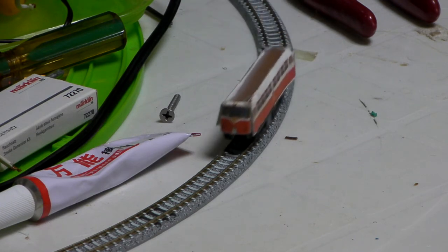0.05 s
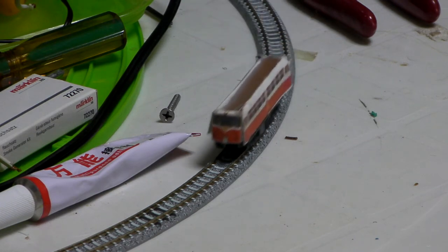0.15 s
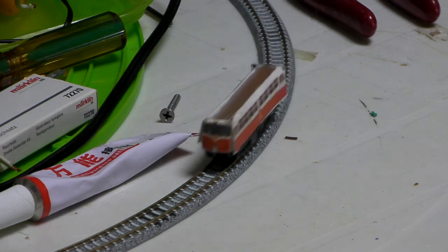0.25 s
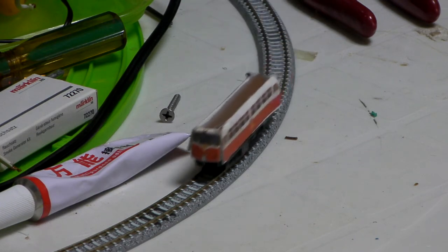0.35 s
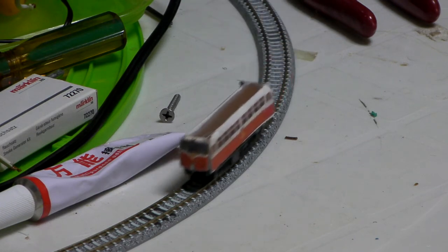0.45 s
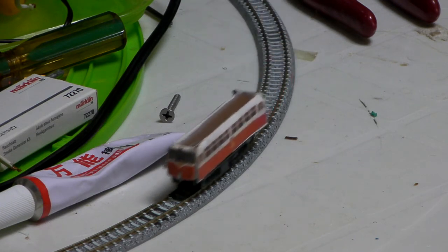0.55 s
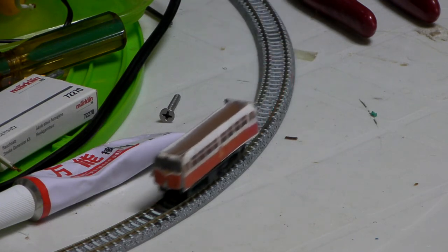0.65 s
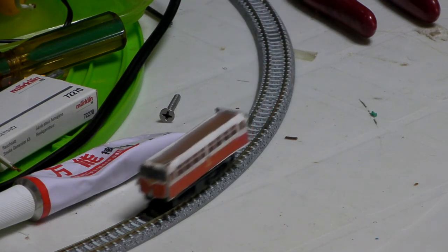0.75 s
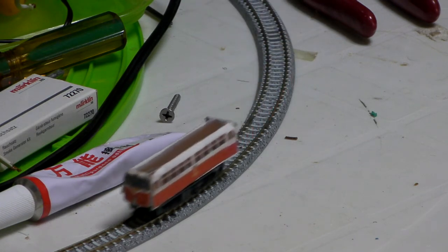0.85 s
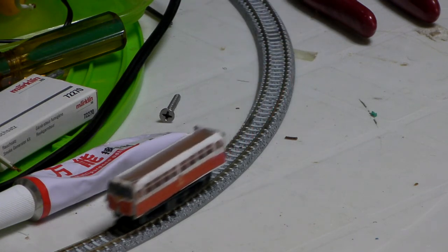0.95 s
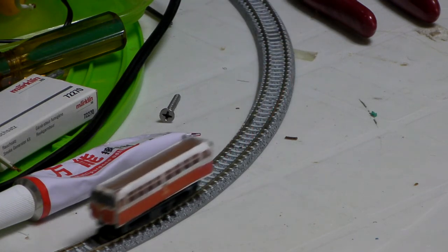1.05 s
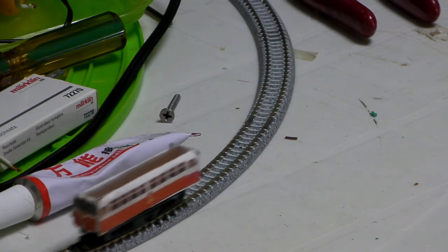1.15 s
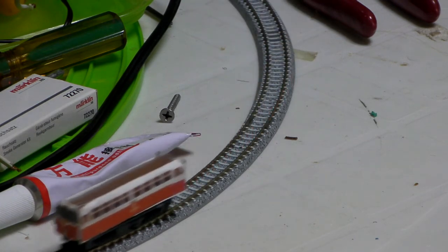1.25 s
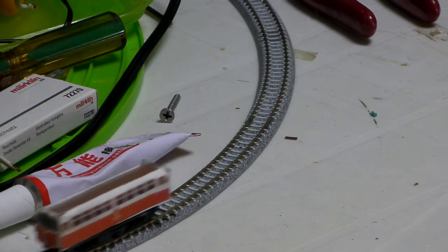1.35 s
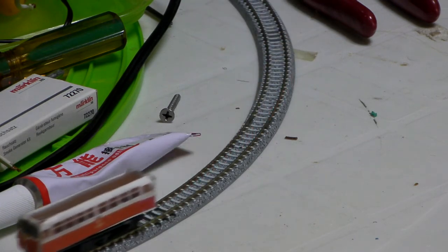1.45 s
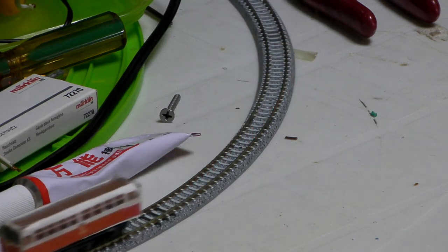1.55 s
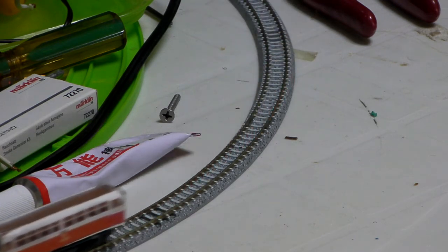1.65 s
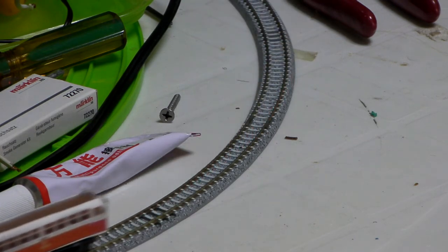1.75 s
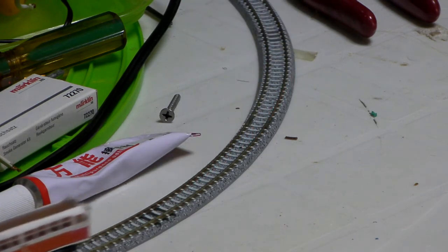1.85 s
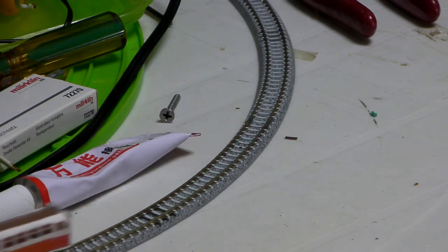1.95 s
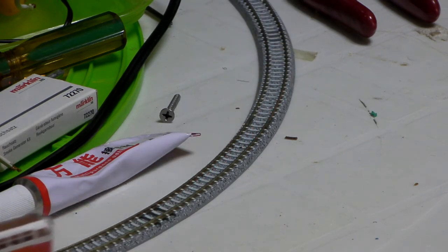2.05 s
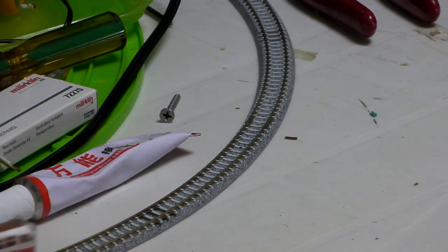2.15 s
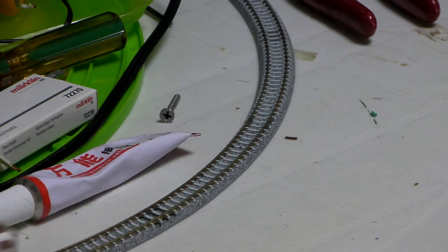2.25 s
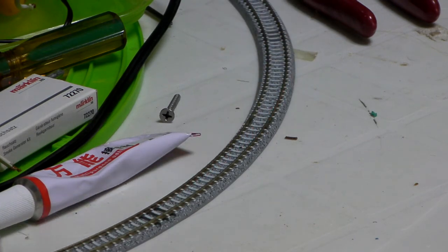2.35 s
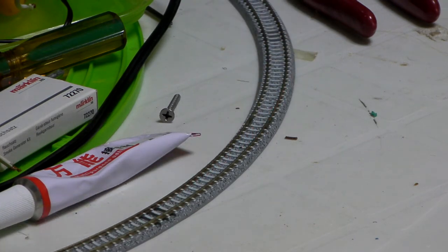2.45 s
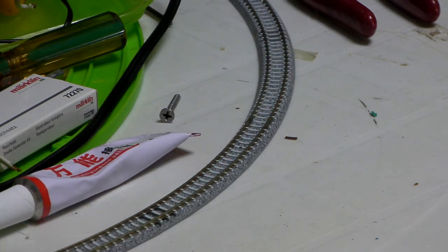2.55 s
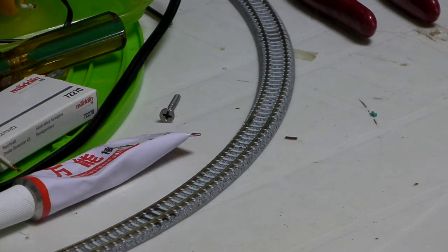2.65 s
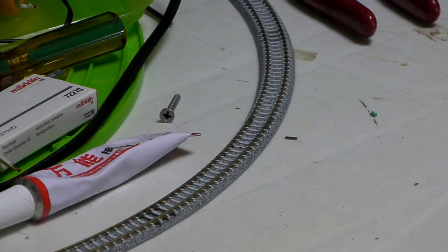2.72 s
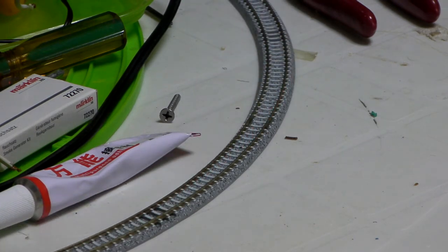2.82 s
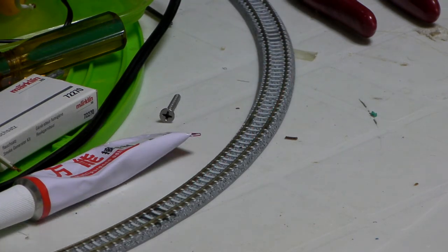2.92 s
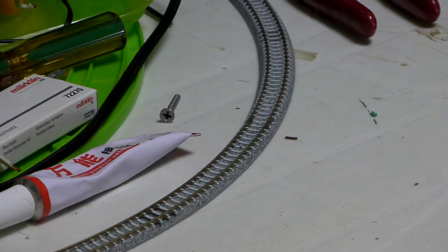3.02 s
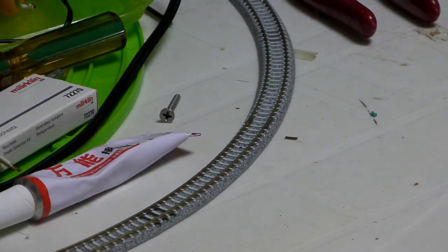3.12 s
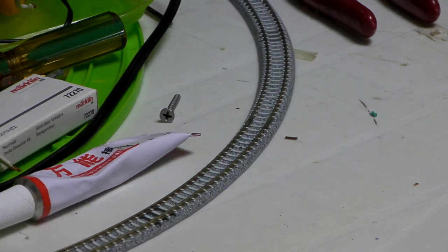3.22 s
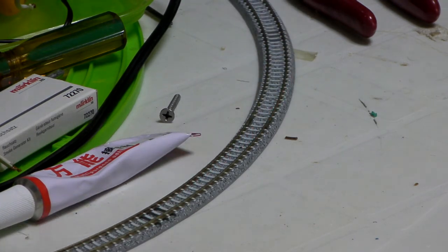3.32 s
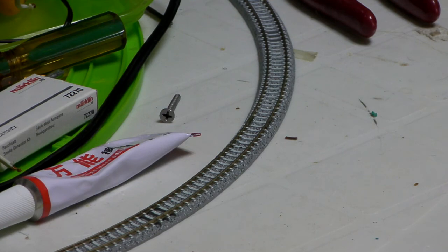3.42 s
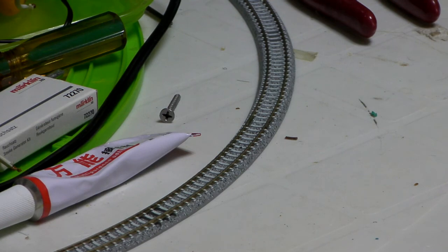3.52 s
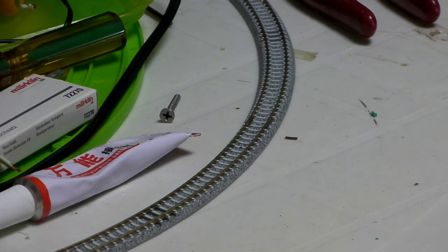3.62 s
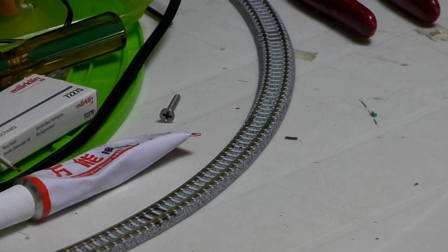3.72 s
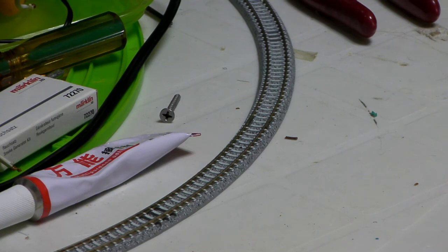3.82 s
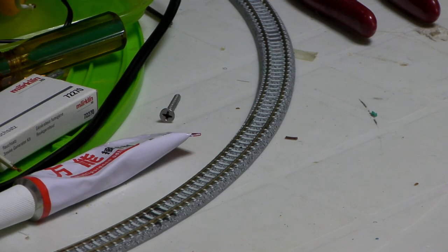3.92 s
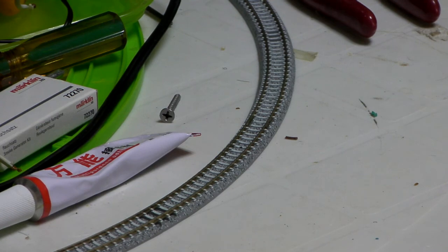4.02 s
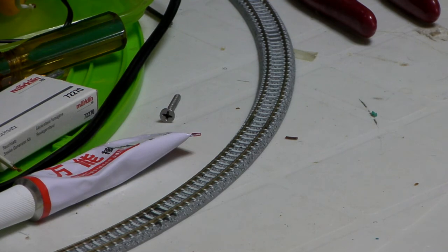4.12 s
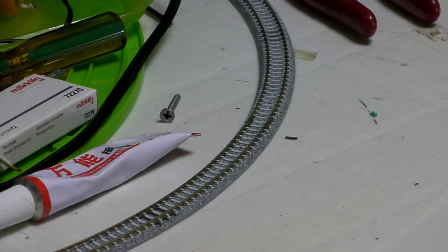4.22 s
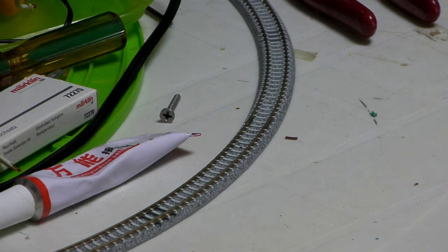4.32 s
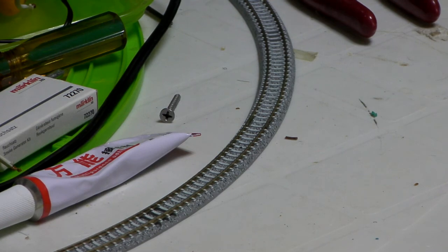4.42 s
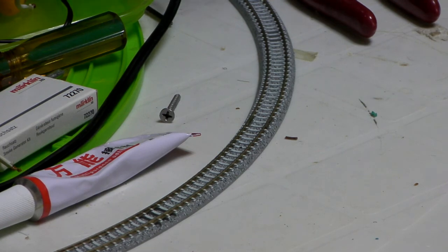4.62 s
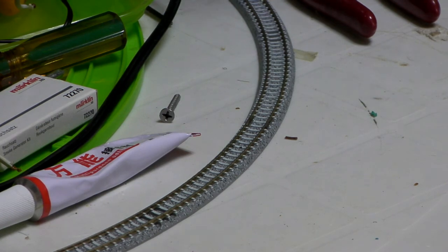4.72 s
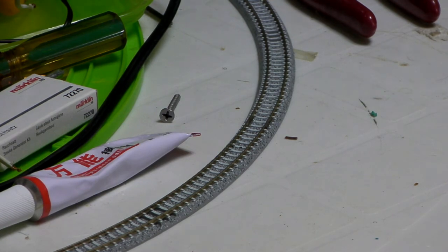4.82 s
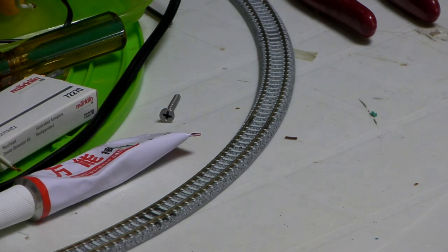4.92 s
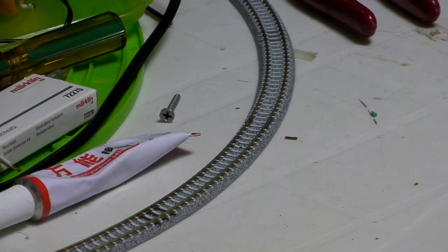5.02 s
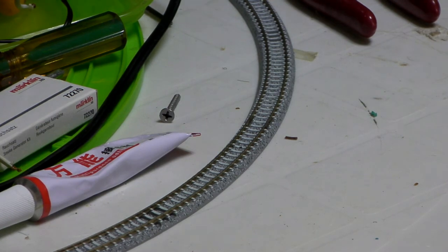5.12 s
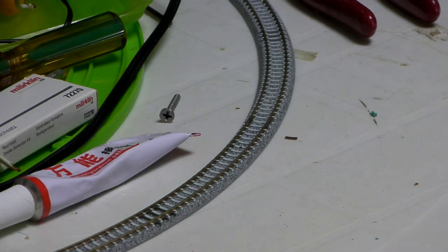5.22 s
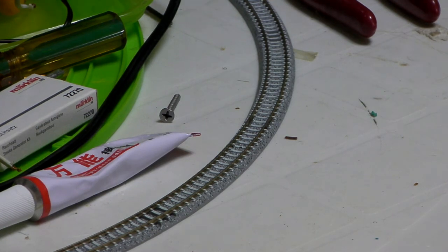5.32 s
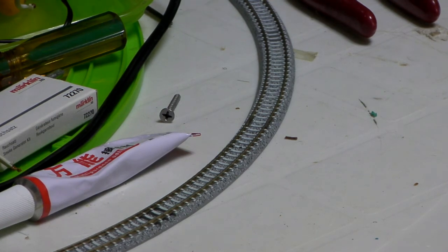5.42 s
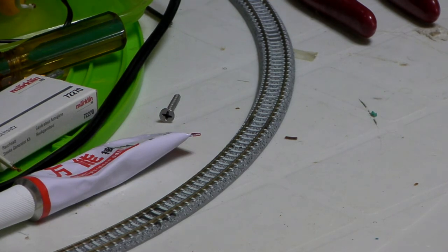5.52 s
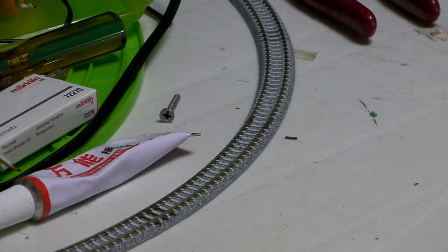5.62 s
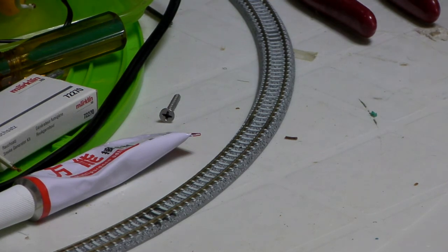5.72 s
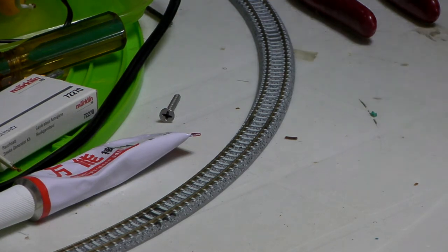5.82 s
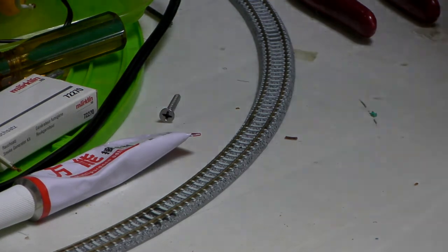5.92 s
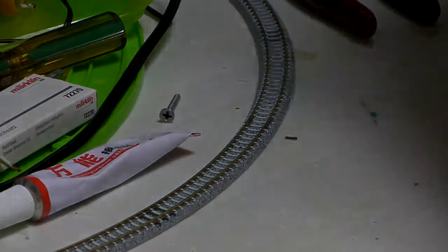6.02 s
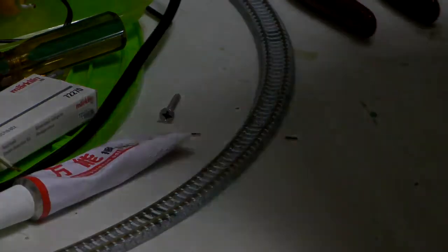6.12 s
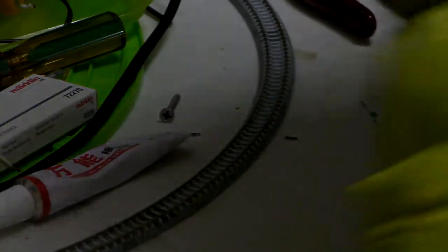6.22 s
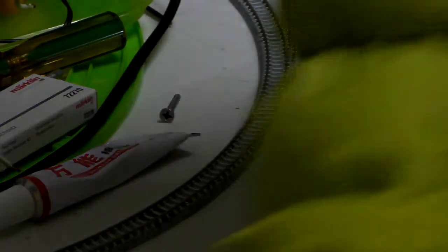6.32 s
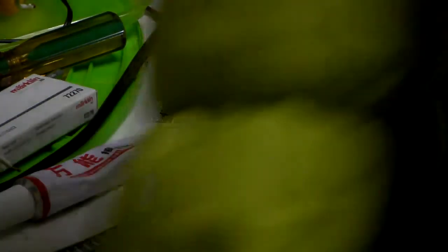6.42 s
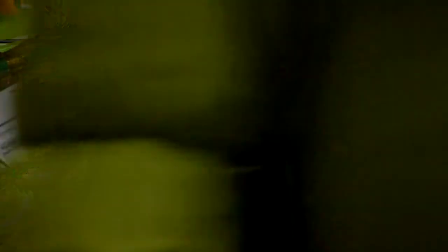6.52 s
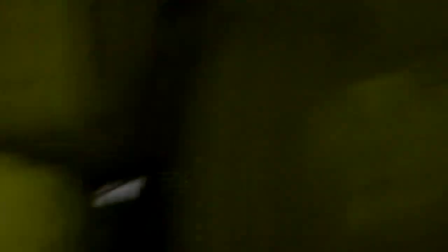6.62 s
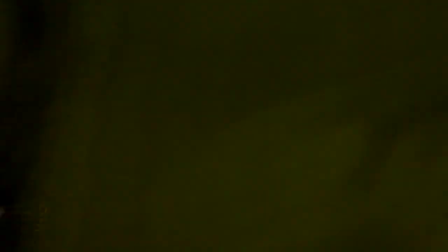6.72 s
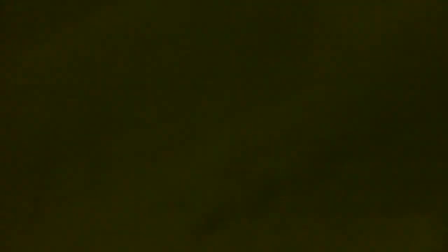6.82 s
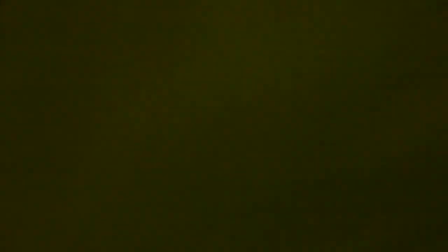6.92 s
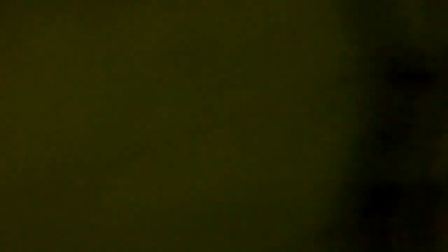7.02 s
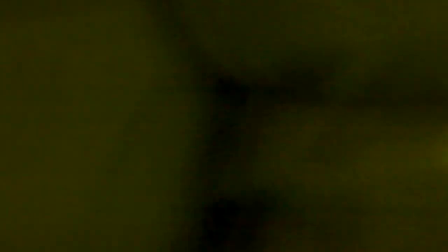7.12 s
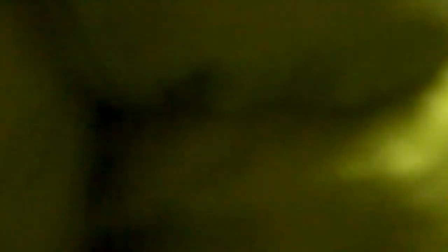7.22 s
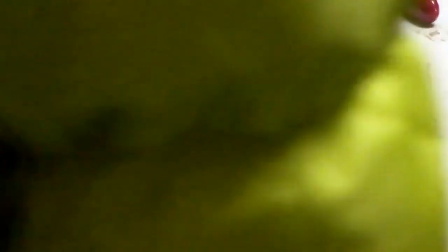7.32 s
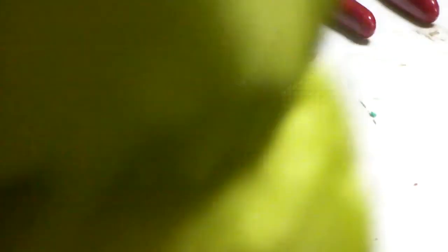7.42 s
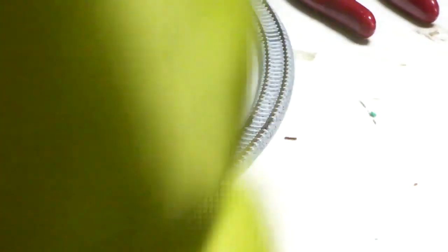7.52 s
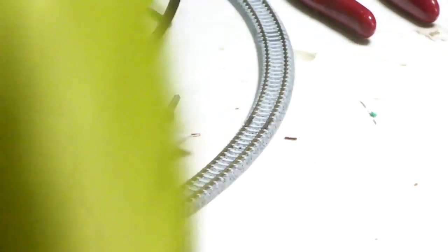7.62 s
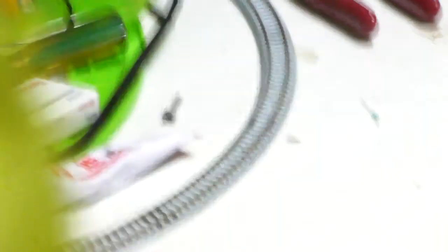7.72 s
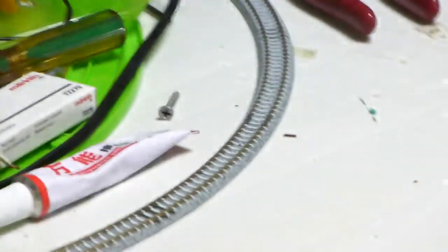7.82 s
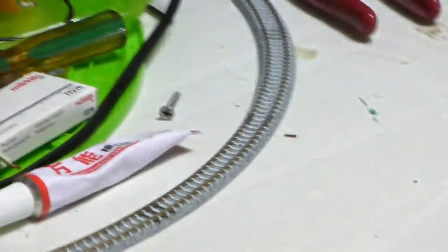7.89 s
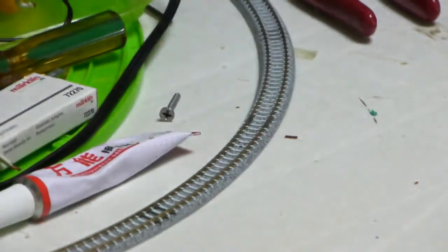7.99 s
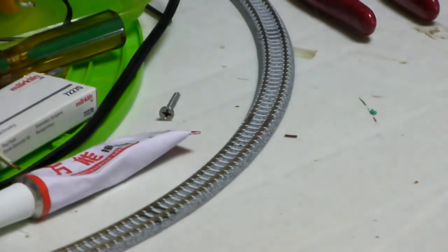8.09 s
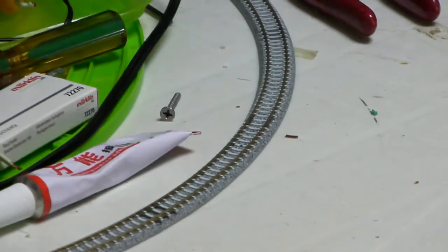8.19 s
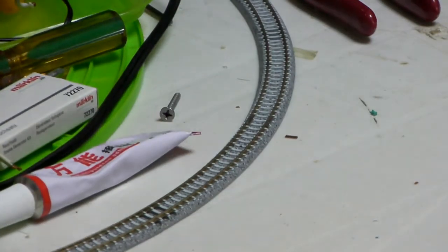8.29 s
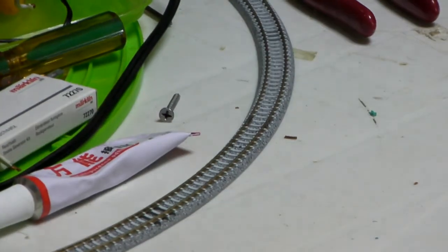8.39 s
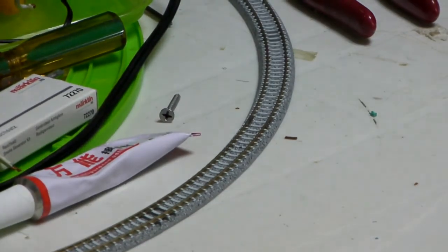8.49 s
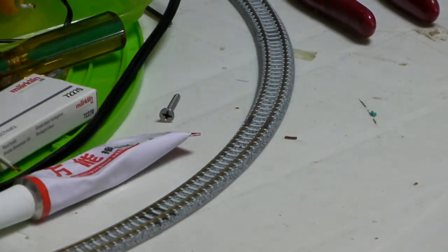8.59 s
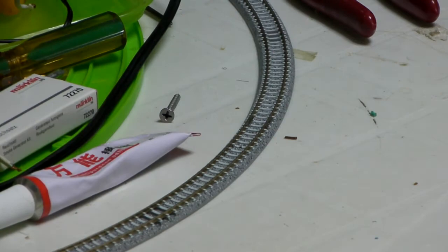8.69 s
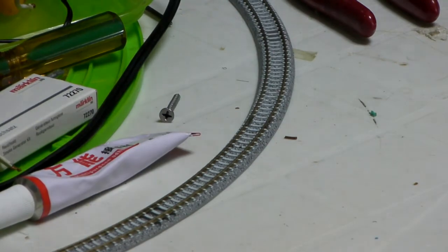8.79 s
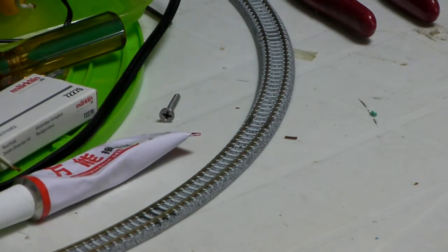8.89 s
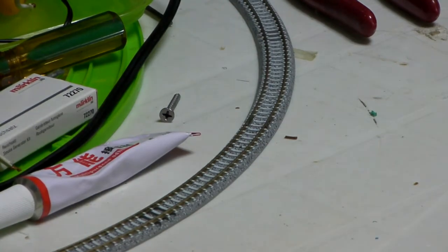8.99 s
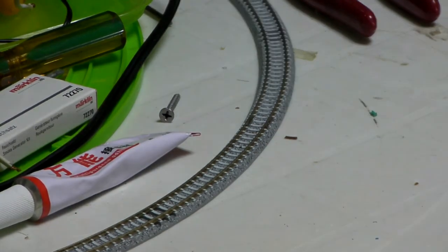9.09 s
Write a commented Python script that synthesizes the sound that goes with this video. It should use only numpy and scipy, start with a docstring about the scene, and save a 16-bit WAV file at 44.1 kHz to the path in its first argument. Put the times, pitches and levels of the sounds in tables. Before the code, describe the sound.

A tiny model railcar whirs with hiss and thin gear whine, a sharp click stops it, then cloth rustles and bumps close by.

```python
"""Toy railcar on a tabletop

A tiny electric railcar whirs on its track: brush hiss and gear whine, ringing in a plastic shell.
Something knocks the table, a switch snaps and the motor stops. Then a sleeve rustles close to the
microphone and bumps it softly. Knocks, bumps and ticks echo in a small room, over its steady hush.
Hiss and cloth are shaped noise, the whine is a throbbing sine, and struck things are dying sines."""
import sys
import numpy as np
from scipy import signal
from scipy.fft import rfft, irfft, next_fast_len
from scipy.io import wavfile
from scipy.ndimage import uniform_filter1d

SR = 44100
rng = np.random.default_rng(int(sys.argv[2]) if len(sys.argv) > 2 else 0)


def unload_audio(sound):
    """Save the sound as a 16-bit wav file, at the path given as the first command line argument."""
    columns = np.transpose(np.atleast_2d(sound))
    # keep every value between -1 and 1, then stretch to whole-number steps
    steps = np.round(np.clip(columns, -1, 1) * 32767)
    wavfile.write(sys.argv[1], SR, steps.astype(np.int16))


N = 403515
T = np.arange(N) / SR  # clock of the whole take, s

# Likeness of the cloth noise at the two microphones: (frequency [Hz], left-right likeness [0-1])
CLOTH_SAME = [(60, 0.92), (180, 0.95), (550, 0.91), (1650, 0.76), (4970, 0.28), (15000, 0.061)]


def amp(db):
    """Turns decibels into gain."""
    return 10 ** (np.asarray(db) / 20)


def evened(x):
    """Scales a sound to rms 1."""
    return x / np.sqrt(np.mean(x ** 2) + 1e-20)


def read(points, hz):
    """Reads a spectrum table on a log-frequency axis."""
    f, value = np.transpose(points)
    return np.interp(np.log(hz + 1), np.log(f + 1), value)


def curves(rows):
    """Draws each column of a time table as a curve at every sample."""
    s, *columns = np.transpose(rows)
    return [np.interp(T, s, c) for c in columns]


def add(mix, s, sound):
    """Mixes a sound in at a time in seconds."""
    part = mix[round(s * SR):][:len(sound)]
    part += sound[:len(part)]


def noise(shape, same, patchy_db):
    """Two-channel noise of a given spectrum and likeness, with drifting patches, rms 1."""
    size = next_fast_len(N)
    hz = np.fft.rfftfreq(size, 1 / SR)
    left, other = rfft(rng.standard_normal((2, size)))
    likeness = np.clip(read(same, hz), -1, 1)
    right = likeness * left + np.sqrt(1 - likeness ** 2) * other
    pair = irfft(np.array([left, right]) * amp(read(shape, hz)), size)
    # patches of louder and softer noise, shared by both channels
    z = signal.stft(pair, nperseg=512)[2]
    patches = uniform_filter1d(rng.standard_normal(z.shape[1:]), size=10, axis=1)  # along time
    patches = uniform_filter1d(patches, size=6, axis=0)  # along frequency
    return evened(signal.istft(z * amp(patchy_db * evened(patches)), nperseg=512)[1][:, :N])


def resonate(x, hz, width):
    """Shifts hz down to zero, smooths, shifts back: a resonance of gain 1."""
    turn = np.exp(2j * np.pi * hz * T)
    r = np.exp(-np.pi * width / SR)
    return 2 * (turn * signal.lfilter([1 - r], [1, -r], x / turn)).real


def wander(per_s):
    """Random drift, rms 1, from sines at rates up to per_s cycles a second."""
    rates = np.geomspace(per_s / 20, per_s, num=12)[:, None]
    coarse = T[::256]
    waves = np.sin(2 * np.pi * (rates * coarse + rng.random(rates.shape)))
    drift = (waves / np.sqrt(rates)).sum(0)
    return evened(np.interp(T, coarse, drift))


def ring(modes, spread=0.02):
    """Dying sines of a struck thing, each pitch strayed at random by the fraction spread."""
    t = T[:SR // 2]
    return sum(amp(db - 60 * t / t60) * np.sin(2 * np.pi * hz * (1 + spread * rng.standard_normal()) * t)
               for hz, db, t60 in modes)


def flattened(x, width_hz):
    """Evens out the broad lumps in the spectrum of a short random sound."""
    z = rfft(x)
    bins = int(width_hz * x.shape[-1] / SR) + 1
    power = uniform_filter1d(abs(z) ** 2, size=bins, axis=-1)
    return irfft(z / np.sqrt(power + 1e-20), x.shape[-1])


def motor():
    """Brush hiss excites the shell; the gear tooth tone throbs at the shaft rate; then all stops."""
    # The run: (time [s], whir level [dB], shell ring over the hiss [dB], top hiss [dB], gear whine [dB])
    run = [(0.0, -50.5, 10, -67, -78), (0.23, -49.5, 8.5, -68, -60), (0.43, -52, 11.5, -61, -71),
           (0.5, -49.5, 8.5, -64, -55), (0.87, -49.5, 2, -61, -62), (0.91, -49, 4, -61, -78),
           (0.99, -50.5, 5, -61, -75), (1.05, -49, 1, -61, -54), (1.28, -49.5, 5, -61, -65),
           (1.52, -52, 5, -63, -74), (1.8, -48.5, 1, -62, -70), (2.4, -50.5, 3, -65, -66),
           (2.6, -52.5, 6.5, -63, -68), (2.76, -48, -1, -59, -68), (3.04, -48, 0, -60, -61),
           (3.2, -50, 1, -63, -67), (3.65, -49.5, 2, -54, -69.5), (3.84, -50.5, 7.5, -56, -61),
           (4.05, -49.5, 4.5, -58, -63)]
    # Hiss of brushes and wheels: (frequency [Hz], relative density [dB per Hz])
    brush_spectrum = [(59, -38), (100, -7.5), (177, -3.5), (264, -11), (439, -2), (542, -5), (1530, -6.5),
                      (2230, -8.5), (2880, -6), (3130, -5.5), (4680, -5.5), (5540, -9), (6700, -10.5),
                      (7930, -11.5), (15600, -11)]
    # Thin top hiss: (frequency [Hz], relative density [dB per Hz])
    top_spectrum = [(10500, -67), (12500, -34), (13500, -35), (14600, 0), (16000, -23)]
    # Likeness of both hisses at the microphones: (frequency [Hz], left-right likeness [0-1])
    whir_same = [(60, 0.61), (180, 0.88), (550, 0.89), (1650, 0.86), (4970, 0.55), (15000, 0.17)]
    # Shell and track resonances: (frequency [Hz], width [Hz], relative level [dB])
    shell_modes = [(434, 21, -6.5), (1508, 24, -5), (4030, 49, -1.5), (4360, 82, -9), (4590, 136, -4),
                   (6560, 270, -4), (7200, 90, -9), (11200, 670, -19)]
    whine_hz, shaft_hz = 2844, 63  # mean rates
    blur_db, blur_width_hz, blur_waver_db = -17.5, 380, 2.5  # level under the whir, width of each pass
    stop_s, coast_s = 4.16, 0.026  # silent from stop_s, after a fade of coast_s

    whir_db, ring_db, top_db, whine_db = curves(run)
    shaft_turns = np.cumsum(shaft_hz * (1 + 0.0517 * wander(4))) / SR
    throb = np.cos(2 * np.pi * shaft_turns)

    hiss = noise(brush_spectrum, whir_same, patchy_db=1.37) * (1 + 0.029 * throb)
    shell = sum(amp(db) * resonate(hiss, hz, width) for hz, width, db in shell_modes)
    whir = evened(hiss + amp(ring_db) * shell)
    top = noise(top_spectrum, whir_same, patchy_db=2.0)

    teeth = np.cumsum(whine_hz * (1 + 0.002 * wander(25))) / SR
    flutter = amp(1.8 * wander(30))  # dB, up to 30 per second
    whine = np.sqrt(2) * np.cos(2 * np.pi * teeth) * (1 + 0.38 * throb) * flutter
    # fuzz of uneven teeth around the whine
    blur = resonate(resonate(hiss, whine_hz, blur_width_hz), whine_hz, blur_width_hz)
    blur = amp(blur_db + blur_waver_db * wander(12)) * evened(blur)

    running = np.clip((stop_s - T) / coast_s, 0, 1)
    return running * (amp(whir_db) * (whir + blur) + amp(top_db) * top + amp(whine_db) * whine)


def blows():
    """Each blow is a short rattling crack, brief body modes and a table boom."""
    # Hard blows: (time [s], crack level [dB], low table boom [dB], brightness [dB per octave])
    strikes = [(3.0646, -49, -37, -1.5), (4.1211, -32.5, -49, 0.7), (4.285, -65, -46, -3.5)]
    # Spectrum of the crack: (frequency [Hz], relative density [dB per Hz])
    crack_spectrum = [(120, -65), (200, -19), (258, -56), (422, -9), (506, -9.5), (940, 0), (1510, -4),
                      (2210, -2), (3610, -6.5), (3890, -0.5), (6350, -9), (15500, -16.5)]
    # What the blows ring with: (frequency [Hz], relative level [dB], time to fall 60 dB [s])
    body_modes = [(432, 1.5, 0.15), (947, 2.5, .07), (1295, 5.5, 0.045), (2163, 2, 0.081),
                  (3085, 11.5, 0.013), (3800, -8, 0.03), (5000, -13, 0.02), (5900, 10, 0.022)]
    # Boom of the tabletop: (frequency [Hz], relative level [dB], time to fall 60 dB [s])
    table_modes = [(166, -2.5, 0.062), (179, -6, 0.057), (370, -2.5, 0.084), (446, -5, 0.075),
                   (584, -11.5, 0.063), (838, -4, 0.046)]

    out, size, cut = np.zeros(N), 4096, 128  # cut: samples dropped from the end
    hz, t = np.fft.rfftfreq(size, 1 / SR), T[:size]
    thin = signal.butter(4, 330, "high", fs=SR, output="sos")  # the crack and body modes carry no deep bass
    for s, db, boom_db, tilt_db in strikes:
        burst = flattened(rng.standard_normal(size) * amp(-60 * t / 0.016), 250)
        tilt = amp(tilt_db * np.log2((hz + 50) / 3000)) * hz / (hz + 300)
        crack = irfft(rfft(burst) * amp(read(crack_spectrum, hz)) * tilt)
        body = irfft(rfft(ring(body_modes, spread=0.0081)[:size]) * tilt)
        hit = evened(crack) + amp(-9.5) * evened(body)
        onset = np.minimum(t[:-cut] / 0.00057, 1)
        add(out, s, amp(db) * signal.sosfilt(thin, hit[:-cut] * onset))
        # the boom comes a little later and rises more slowly
        boom = ring(table_modes)
        boom_onset = np.minimum(T[:len(boom)] / 0.006, 1)
        add(out, s + 0.00372, amp(boom_db) * boom * boom_onset)
    return out


def sleeve():
    """Fibres slip in dense tiny grains, duller when faint; the cloth also drags a deep rumble and a hollow rub."""
    # Moves of the sleeve: (time [s], rustle level [dB], level of the drag on the housing [dB])
    moves = [(4.36, -71.5, -79), (4.7, -66.5, -78.5), (4.83, -55, -69), (4.93, -65, -77), (5.12, -65, -74),
             (5.24, -55, -62), (5.37, -64, -63), (5.46, -47.5, -60), (5.53, -58.5, -67.5), (5.77, -60, -69),
             (5.86, -63.5, -75), (5.95, -59.5, -62.5), (6.37, -59, -67.5), (6.55, -56.5, -57),
             (6.7, -64.5, -67), (6.82, -65, -71.5), (6.98, -58, -63), (7.33, -62.5, -70.5),
             (7.43, -58.5, -71), (7.6, -63, -67), (7.78, -60, -56.5), (7.92, -60, -66), (8.13, -67, -69.5),
             (8.27, -59.5, -61), (8.38, -58.5, -55.5), (8.49, -57.5, -64.5), (8.62, -70, -70.5),
             (8.78, -58.5, -62.5), (8.88, -64, -66.5), (9.03, -60.5, -66.5), (9.15, -66.5, -70)]
    # Spectra of rustle, drag and hollow rub: (frequency [Hz], relative density [dB per Hz])
    rustle_spectrum = [(290, -34), (500, -27), (620, -15), (914, -6), (1700, -5), (1990, -4), (2610, -4),
                       (4700, -7), (15500, -19.5)]
    drag_spectrum = [(20, -37), (45, -12), (80, -2.5), (160, -3), (230, -8.5), (320, -56)]
    rub_spectrum = [(230, -23), (300, -13), (400, -4), (520, -12), (750, -14.5), (1200, -21.5), (2000, -30)]
    # treble lift of a brisk rustle; below brisk_db it dulls by dulling dB per dB
    lift_db, brisk_db, dulling = 4, -63.5, 2.6
    # rub level when the drag is at firm_db; it follows the drag by this many dB per dB
    firm_rub_db, firm_db, rub_follow = -58.5, -61, 0.75

    rustle_db, drag_db = curves(moves)
    rub_db = firm_rub_db + rub_follow * (drag_db - firm_db)
    treble_db = lift_db + dulling * np.minimum(rustle_db - brisk_db, 0)

    slips = rng.exponential(1, N // 40 + 1).repeat(40)[:N]  # a new random strength every 40 samples
    grains = amp(0.84 * uniform_filter1d(slips, size=30))
    fibres = evened(noise(rustle_spectrum, CLOTH_SAME, patchy_db=1.0) * grains)
    high = signal.sosfiltfilt(signal.butter(2, 6500, "high", fs=SR, output="sos"), fibres)
    rustle = amp(rustle_db) * (fibres - high + amp(treble_db) * high)

    drag = amp(drag_db) * noise(drag_spectrum, CLOTH_SAME, patchy_db=1.2)
    rub = amp(rub_db) * noise(rub_spectrum, CLOTH_SAME, patchy_db=1.8)
    entry = np.clip((T - 4.3) / 0.048, 0, 1)
    return entry * (rustle + drag + rub) + swishes()


def swishes():
    """A quick pull of the cloth: a burst of fibre noise around one broad centre."""
    # Quick swishes: (time [s], level before the swell and fall [dB], centre frequency [Hz])
    pulls = [(5.888, -47.5, 2800), (6.388, -46.5, 3200), (6.419, -39.5, 583), (6.433, -47, 1080),
             (6.53, -50, 2500), (6.868, -43.5, 3020), (7.64, -48.5, 6030), (7.735, -48.5, 670),
             (8.717, -49, 3530)]
    rise_s, t60_s = 0.0066, 0.26
    out, t = np.zeros((2, N)), T[:SR // 4]
    fibres = noise([(100, -3), (16000, -15.0)], CLOTH_SAME, patchy_db=1.0)
    swell_and_fall = amp(-60 * t / t60_s) * (1 - np.exp(-t / rise_s))
    for s, db, hz in pulls:
        start = round(s * SR)
        at = slice(start, start + len(t))
        band = signal.butter(1, [hz / 1.8, hz * 1.54], "band", fs=SR, output="sos")
        out[:, at] += amp(db) * swell_and_fall * evened(signal.sosfilt(band, fibres[:, at]))
    return out


def bumps():
    """Soft contacts near the microphone: a low swing that swells over about a cycle and dies away."""
    # Soft bumps: (time [s], level before the swell and fall [dB], pitch [Hz])
    contacts = [(5.943, -45, 323), (5.953, -28.5, 157), (5.981, -33.5, 152), (6.411, -29, 52),
                (6.4209, -26, 335), (6.426, -22, 129), (6.432, -25.5, 430), (6.445, -22, 115),
                (6.458, -38, 374), (6.474, -27, 187), (7.644, -35, 75), (7.661, -34.5, 152),
                (7.679, -25.5, 72.4), (7.715, -32, 87), (8.735, -43, 166), (8.755, -36.5, 80.6)]
    rise_cycles = 1
    t60_at_100_hz, damping = 0.098, 0.48  # s, falling with pitch to this power
    out, t = np.zeros(N), T[:SR // 3]
    for s, db, hz in contacts:
        t60 = t60_at_100_hz * (100 / hz) ** damping
        swell = 1 - np.exp(-t * hz / rise_cycles)
        add(out, s, amp(db - 60 * t / t60) * swell * np.sin(2 * np.pi * hz * t))
    return out


def ticks():
    """Small contacts snap and ring a cluster of short neighbouring modes."""
    # Small ticks: (time [s], level of the ring's main mode before a small trim [dB], pitch [Hz], snap [dB])
    contacts = [(1.609, -41, 4900, -60), (6.786, -52.5, 706, -62), (6.815, -48.5, 500, -66),
                (6.853, -50, 600, -62), (7.554, -50.5, 704, -64), (7.698, -39, 3150, -52),
                (7.7058, -45.5, 1320, -44), (9.02, -51.5, 660, -64)]
    # Modes of each tick: (pitch ratio, trim [dB], share of the ring time)
    cluster = [(1, -3, 1), (.93, -8, 1), (1.1, -9, .7), (1.9, -14, .4)]
    t60_at_1_khz, damping = 0.048, 0.64  # s, falling with pitch to this power
    snap_t60_s = 0.022
    out, t = np.zeros(N), T[:2048]
    band = signal.butter(2, [900, 6500], "band", fs=SR, output="sos")
    for s, db, hz, snap_db in contacts:
        t60 = t60_at_1_khz * (1000 / hz) ** damping
        modes = [(ratio * hz, mode_db, share * t60) for ratio, mode_db, share in cluster]
        add(out, s, amp(db) * ring(modes))
        snap = evened(signal.sosfilt(band, rng.standard_normal(len(t))))
        add(out, s, amp(snap_db - 60 * t / snap_t60_s) * snap)
    return out


def room(x):
    """Sparse taps of random sign, each band dying at its own speed; the two sides agree in the bass."""
    # Decay of the room: (frequency [Hz], time to fall 60 dB [s])
    decay = [(300, 0.24), (1000, 0.19), (3000, 0.22), (7000, .2), (14000, 0.18)]
    # Likeness of the echoes at the microphones: (frequency [Hz], left-right likeness [0-1])
    room_same = [(60, 1), (180, 0.91), (550, 0.98), (1650, 0.85), (4970, 0.44), (15000, 0.05)]
    taps = np.zeros((2, SR // 2))
    starts = np.arange(60, SR // 2 - 20, 12)
    at = starts + rng.integers(0, 12, (2, len(starts)))  # one tap in every 12 samples
    np.put_along_axis(taps, at, rng.choice([-1., 1.], at.shape), 1)
    hz, t, z = signal.stft(taps, SR, nperseg=128)
    same = np.clip(read(room_same, hz), -1, 1)[:, None]
    z = np.array([z[0], same * z[0] + np.sqrt(1 - same ** 2) * z[1]])
    fall = amp(-60 * t / read(decay, hz)[:, None])
    tail = flattened(signal.istft(z * fall, SR, nperseg=128)[1], 91)
    tail = tail[:, 60:-2000]  # drops the empty start and the far end
    return signal.fftconvolve(x[None], tail / np.linalg.norm(tail[0]), axes=1)[:, :N]


def hush():
    """Steady noise of the quiet room, more alike at the two microphones in the bass."""
    # Spectrum of the hush: (frequency [Hz], relative density [dB per Hz])
    hush_spectrum = [(15, -40), (25, -8), (164, -3), (227, -5), (281, -20), (433, -3), (970, -13.5),
                     (2120, -16), (2300, -29), (3260, -19), (7910, -23.5), (12500, -17.5), (15500, -22)]
    # Likeness at the microphones: (frequency [Hz], left-right likeness [0-1])
    hush_same = [(60, 0.85), (180, 0.61), (550, 0.35), (1650, 0.25), (4970, 0.13), (15000, 0.015)]
    return amp(-64) * noise(hush_spectrum, hush_same, patchy_db=1.0)


def scene():
    """Sums all sources; the blows echo clearly, the contacts near the microphone only a little."""
    hits = blows()
    near = bumps() + ticks()
    echoes = amp(6.5) * room(hits) + room(amp(-12) * near)
    return motor() + hits + sleeve() + near + echoes + hush()


def record(dry):
    """Microphone pair, a little weaker on the left, then the upper band limit."""
    # Balance of the pair: (frequency [Hz], left over right [dB])
    balance = [(60, -1.5), (240, -0.5), (950, -0.5), (3770, -0.5), (15000, -1.5)]
    edge_hz = 15730
    size = next_fast_len(N)
    half_db = read(balance, np.fft.rfftfreq(size, 1 / SR)) / 2
    pair = irfft(rfft(dry, size) * amp([half_db, -half_db]), size)[:, :N]
    low_pass = signal.firwin(1023, edge_hz, window=("kaiser", 9), fs=SR)
    return signal.oaconvolve(pair, low_pass[None], "same")


dry = scene()
out = record(dry)
unload_audio(out)
```